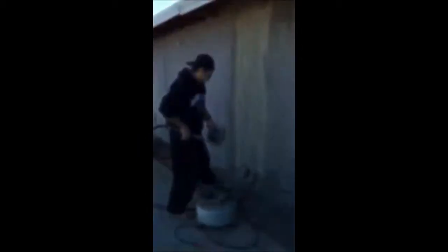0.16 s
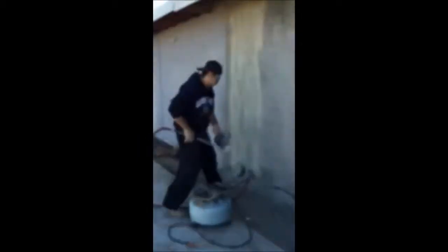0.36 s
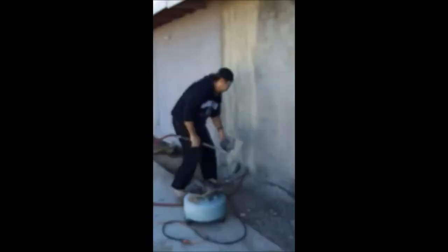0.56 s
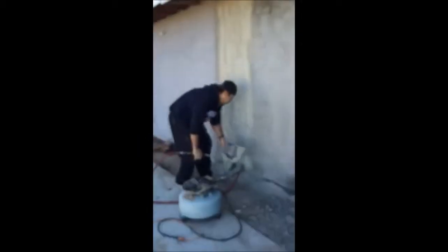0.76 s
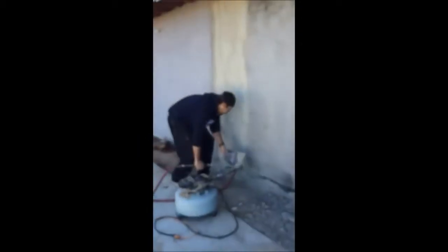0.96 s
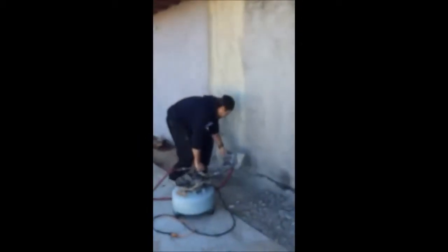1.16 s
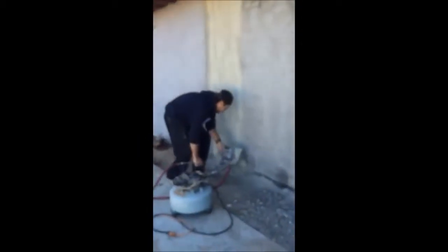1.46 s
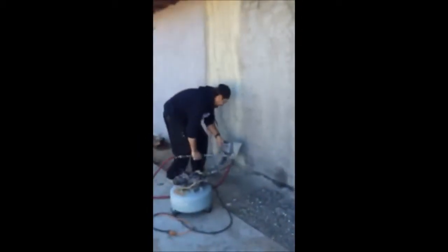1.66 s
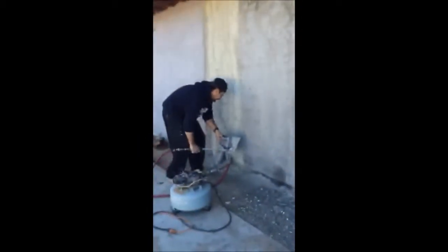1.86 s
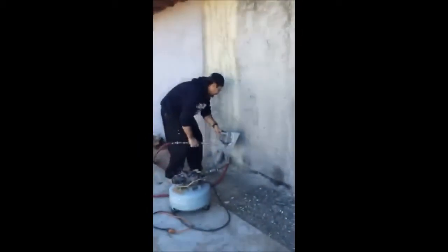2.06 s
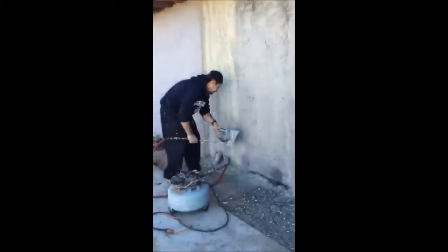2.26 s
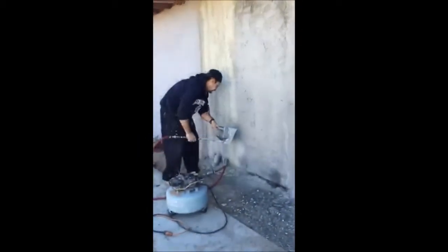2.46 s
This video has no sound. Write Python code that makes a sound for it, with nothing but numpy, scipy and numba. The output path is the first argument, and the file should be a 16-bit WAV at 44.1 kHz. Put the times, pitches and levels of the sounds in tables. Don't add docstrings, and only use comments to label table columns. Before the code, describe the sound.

Compressed-air plaster sprayer bursts into a loud, sputtering hiss over a steadily chugging compressor outdoors

```python
import sys
import numpy as np
from scipy import signal
from scipy.io import wavfile
from scipy.ndimage import map_coordinates
from numba import njit

SR = 44100
rng = np.random.default_rng(int(sys.argv[2]) if len(sys.argv) > 2 else 0)


def ratio(d):
    e = np.asarray(d, float) / 20
    return 10 ** e


def to_wav(sig):
    pcm = np.clip(np.atleast_2d(sig), -1, 1) * 32767
    pcm = np.round(pcm).astype(np.int16)
    wavfile.write(sys.argv[1], SR, pcm.T)


N = 115101
T = np.arange(N) / SR

# time in seconds, air flow in dB, second cavity in Hz, upper cavities in dB.
GUN_FLOW = [(1.36, -13, 3300, -4.5), (1.42, -15, 3500, -5), (1.6, -20.5, 3480, -6.5), (1.67, -18, 3800, -5),
            (1.78, -18, 3900, -10), (1.93, -18, 3330, -2), (2.05, -17.5, 3300, -4.5),
            (2.22, -17, 2910, -6.5), (2.32, -17.5, 3220, -3.5), (2.48, -19.5, 3070, -2.5),
            (2.61, -17, 2850, -4)]
# time in seconds, lowest cavity in Hz, its partner in Hz,
# dead band in Hz, strength in dB.
NOZZLE_SHAPE = [(1.36, 2110, 2650, 2000, -2), (1.43, 1680, 2200, 2770, -1), (1.6, 1820, 2190, 2700, 1.5),
                (1.75, 1750, 2080, 2840, -1), (1.82, 1580, 1940, 2740, 3), (1.93, 1300, 1650, 2190, -1),
                (2.05, 1290, 2430, 2690, -0.5), (2.2, 1290, 2170, 2620, 1.5), (2.3, 1260, 1920, 2440, -2),
                (2.45, 1250, 1660, 2380, -0.5), (2.55, 1280, 1690, 2360, 1.5), (2.61, 1250, 2020, 2400, -8)]
# time in seconds, level in dB.
THROAT_SONG = [
    (1.36, 0.5),
    (1.5, 0.5),
    (1.6, -3),
    (1.95, -2),
    (2.2, -10),
    (2.32, -4.5),
    (2.51, 4.5),
    (2.54, -23),
    (2.61, -23),
]
# time in seconds, peak in dB.
EARLY_SLUGS = [(1.361, -8), (1.382, 0), (1.406, -9), (1.434, -1), (1.451, -5), (1.469, -3), (1.484, -11),
               (1.5024, 1), (1.512, -2), (1.534, 0), (1.566, 3), (1.58, -11), (1.602, 1), (1.621, 0.5),
               (1.6542, -6), (1.6833, -6.5), (1.697, -21), (1.715, -6), (1.7436, -6), (1.771, -10),
               (1.7928, 2.5), (1.8094, -9), (1.84, -5.5), (1.8634, -13), (1.8845, -0.5), (1.8914, -11),
               (1.916, -9), (1.9395, -7.5), (1.9706, -10)]
# time in seconds, peak in dB.
LATE_SLUGS = [(1.993, -12), (2.021, -9.5), (2.0565, -9), (2.0784, -14), (2.1034, -13), (2.1274, -27),
              (2.1506, -11.5), (2.1894, -34), (2.2034, -12), (2.2253, -0.5), (2.2534, -11), (2.282, -8.5),
              (2.3067, -9), (2.324, -2), (2.3354, -8), (2.3514, -15), (2.3703, -5.5), (2.3824, -2),
              (2.393, -10), (2.411, -7), (2.4247, -19), (2.448, -3), (2.4644, -26), (2.4794, -2.5),
              (2.5004, -6), (2.5184, -4), (2.5344, -15), (2.5454, -3), (2.5664, -25), (2.5903, 2)]
# frequency in Hz, density in dB per Hz.
JET_COLOUR = [(400, -34), (800, -16.5), (1700, -4.5), (4400, -2.5), (8000, -11.5), (10500, -8.5),
              (13000, -10.5), (16500, -9)]
# frequency in Hz, width in Hz, level in dB.
MIST_WHISTLES = [(5590, 820, -14), (6960, 900, -17.5), (8330, 590, -17.5), (12950, 1300, -15)]
# time in seconds, level in dB.
HOPPER_LEVEL = [(1.36, -63), (1.39, -26), (1.47, -26.5), (1.56, -31), (1.61, -48.5), (1.72, -42),
                (1.77, -30), (1.83, -42), (2.0, -44), (2.06, -30), (2.12, -40), (2.3, -46), (2.35, -30),
                (2.42, -53), (2.61, -28)]
# frequency in Hz, level in dB,
# decay by 60 dB in seconds, delay in seconds.
EXHAUST_RINGS = [(2280, -30, 0.05, .004), (3300, -33, 0.04, .0165), (3400, -33, .04, .027)]
# multiple of the firing rate, level in dB.
ENGINE_ORDERS = [(1, -35), (2, -4), (3, -19), (4, -23.5), (5, 1.5), (6, -0.5), (7, 2), (8, -10.5), (9, -4),
                 (10, -31), (11, -11.5), (12, -0.5), (13, -6), (14, -0.5), (15, -2.5), (16, 0), (17, -3.5),
                 (18, -13), (19, -22.5), (20, -9), (21, -11.5), (22, -23.5), (23, -9.5), (24, -25),
                 (25, -49), (26, -9.5), (27, -3), (28, -4), (29, -2.5), (30, 1.5), (31, -3), (32, -7),
                 (33, -4), (34, -11), (35, -0.5), (36, -12), (37, -14), (38, 1), (39, 0.5), (40, -19),
                 (41, -9.5), (42, -10), (43, -5), (44, -9), (45, -11), (46, -10.5), (47, -8), (48, -9),
                 (49, -28), (50, -27), (51, -14), (52, -7), (53, -10), (54, 1), (55, -20), (56, -9),
                 (57, -4), (58, 1.5), (59, 2.5), (60, -5)]
# frequency in Hz, arrival after firing in seconds,
# phase scatter in radians.
PIPE_DELAY = [(60, .016, .2), (100, .016, .2), (140, .002, .2), (300, .002, .3), (380, .001, .5),
              (560, .012, .5), (800, .001, .5), (1150, .003, .5), (1400, .003, 1.3), (1700, .004, 3)]
# frequency in Hz, width in Hz, level in dB,
# centre after firing in seconds, length in seconds.
VALVE_HISSES = [(9100, 570, -35.5, 0.0207, 0.0044), (9350, 700, -38.5, 0.022, 0.0056),
                (14500, 700, -41, .0035, .005), (14600, 700, -41, .008, .0045),
                (6560, 780, -41, 0.024, 0.0049), (12900, 1300, -47, .0243, .003)]
# time in seconds, level in dB.
PUMP_CHUFFS = [(.06, -25), (.32, -24.5), (.48, -23.5), (.70, -21.5), (.93, -24), (1.18, -20), (1.41, -56),
               (1.64, -64), (1.87, -28), (2.1, -40), (2.33, -34), (2.56, -46)]
# frequency in Hz, width in Hz, level in dB.
CHUFF_COLOUR = [(1357, 670, -1.5), (3830, 1100, -12.5), (5860, 4800, -12.5)]
# frequency in Hz, width in Hz, level in dB.
CASING_PANELS = [(1900, 550, -36), (1160, 620, -38.5), (3300, 310, -39), (9560, 1500, -42),
                 (6280, 860, -41.5), (4140, 570, -42.5), (12900, 5200, -42.5), (15000, 900, -49)]
# frequency in Hz, density in dB per Hz.
CLATTER_COLOUR = [(25, -22), (110, -4.5), (400, -10.5), (750, -8), (1300, -5.5), (2600, -9), (7000, -17),
                  (15500, -39)]

TRIGGER_S, OPEN_S = 1.3585, .002
SLUG_RISE_S, SLUG_FALL_S, SLUG_MEAN_DB = 0.0017, 0.0021, -4
FIRST_STRETCH, SETTLE_S = 4, 0.12
CAVITY_WIDTH_HZ, UPPER_WIDTH_HZ, THIRD_CAVITY_HZ = 380, 480, 4400
FIRING_HZ, FIRST_FIRING_S = 32.09, .0085


def rms_one(x):
    return x / np.sqrt(np.mean(x ** 2) + 1e-20)


def in_time(rows):
    s, *columns = np.transpose(rows)
    return [np.interp(T, s, c) for c in columns]


def drift(rate):
    r = np.exp(-20 * np.pi * rate / SR)
    white = rng.standard_normal(N // 10 + 4002)
    slow = signal.lfilter([1], [1, -2 * r, r * r], white)[4000:]
    return np.interp(np.arange(N) / 10, np.arange(len(slow)), rms_one(slow))


@njit
def glide(x, c, r):
    y = np.zeros(len(x))
    for i in range(2, len(x)):
        y[i] = (1 - r * r) / 2 * (x[i] - x[i - 2]) + 2 * r * c[i] * y[i - 1] - r * r * y[i - 2]
    return y


def resonance(x, hz, width_hz):
    return glide(x, np.cos(2 * np.pi * hz / SR) + np.zeros(len(x)), np.exp(-np.pi * width_hz / SR))


def hiss_in(hz, width_hz):
    once = resonance(rng.standard_normal(N), hz, width_hz)
    return rms_one(resonance(once, hz, width_hz))


def banded_noise(spectrum, patchy_db, rate):
    out = np.zeros(N)
    edges = 22 * 2 ** np.arange(0, 9.7, 1 / 3)
    hz, level_db = np.transpose(spectrum)
    white = rng.standard_normal((2, N))
    for k, (low, high) in enumerate(zip(edges, edges[1:])):
        band_filter = signal.butter(2, [low, high], "band", fs=SR, output="sos")
        band = signal.sosfilt(band_filter, white[k % 2])
        db = np.interp(np.log(low * high) / 2, np.log(hz), level_db)
        out += ratio(db + patchy_db * drift(rate)) * band
    return rms_one(out)


def humps(rows, rise_s, fall_s):
    return sum(ratio(db) * np.exp(-.5 * ((T - s) / np.where(T < s, rise_s, fall_s)) ** 2) for s, db in rows)


def gun():
    flow_db, second_hz, upper_db = in_time(GUN_FLOW)
    low_hz, partner_hz, dead_hz, lower_db = in_time(NOZZLE_SHAPE)
    gate = np.clip((T - TRIGGER_S) / OPEN_S, 0, 1)
    slugs = plaster_slugs() * ratio(flow_db.mean() - flow_db)
    cavity = nozzle_cavities(low_hz, partner_hz, lower_db, second_hz, upper_db)
    jet = air_jet(dead_hz, second_hz)
    throb = (0.44 + 1.17 * slugs) * cavity + (0.88 + 0.89 * np.tanh(slugs)) * jet
    sputter = ratio(2 * drift(150))
    return gate * (ratio(flow_db) * (sputter * throb + air_rumble()) + hopper_drone())


def plaster_slugs():
    rows = [(s + SLUG_RISE_S, db - SLUG_MEAN_DB) for s, db in list(EARLY_SLUGS) + list(LATE_SLUGS)]
    stretch = 1 + FIRST_STRETCH * np.exp(-np.abs(T - TRIGGER_S) / SETTLE_S)
    return humps(rows, SLUG_RISE_S, SLUG_FALL_S * stretch)


def nozzle_cavities(low_hz, partner_hz, lower_db, second_hz, upper_db):
    second_level = ratio(2 + 1.2 * drift(36))
    second = second_level * hiss_in(second_hz * (1 + 0.015 * drift(16.7)), UPPER_WIDTH_HZ)
    third_level = ratio(-1.5 + in_time(THROAT_SONG)[0] + 0.64 * drift(40))
    third = third_level * hiss_in(THIRD_CAVITY_HZ * (1 + 0.015 * drift(6.2)), UPPER_WIDTH_HZ)
    lower = np.zeros(N)
    for hz in (low_hz, partner_hz):
        level = ratio(lower_db - 3 + 1.2 * drift(30))
        lower += level * hiss_in(hz * (1 + .015 * drift(18)), CAVITY_WIDTH_HZ)
    return ratio(-3.5) * lower + ratio(1.35 * upper_db) * (second + third)


def air_jet(dead_hz, second_hz):
    jet = ratio(-1.5) * banded_noise(JET_COLOUR, patchy_db=1.5, rate=27) + wall_splat()
    for hz, width_hz, db in MIST_WHISTLES:
        level = ratio(db + 3.5 * drift(6.4))
        jet = jet + level * hiss_in(hz * (1 + .04 * drift(3.5)), width_hz)
    for valley_hz in (dead_hz, (second_hz + THIRD_CAVITY_HZ) / 2):
        jet = jet - .55 * resonance(jet, valley_hz, 500)
    return jet


def wall_splat():
    hits = rng.random(N) < 580 / SR
    size = ratio(3.8 * rng.exponential(1, N).clip(0, 4))
    drops = hits * rng.standard_normal(N) * size
    return ratio(-13) * rms_one(resonance(drops, 5300, 5400))


def air_rumble():
    roar = ratio(-17) * resonance(hiss_in(290, 445), 296, 580)
    return roar + ratio(-34 + 4.6 * drift(6)) * hiss_in(71, 90)


def hopper_drone():
    shell_hz = 221.5
    hum = np.sin(2 * np.pi * np.cumsum(shell_hz * (1 + 0.029 * drift(14.7))) / SR)
    return ratio(in_time(HOPPER_LEVEL)[0]) * (hum + ratio(-2.5) * hiss_in(shell_hz, 100))


def engine():
    return exhaust_rings() + exhaust_note() + valves()


def exhaust_rings():
    lead = SR // 2
    fire = FIRST_FIRING_S + np.arange(-12, 83) / FIRING_HZ
    fire = fire + .00005 * rng.standard_normal(len(fire))
    rings = np.zeros(N + SR)
    for hz, db, t60, delay in EXHAUST_RINGS:
        clicks = np.full(N + SR, 1e-18)
        at = ((fire + delay) * SR).astype(int) + lead
        clicks[at] = ratio(db + .6 * rng.standard_normal(len(fire)))
        r, w = ratio(-60 / (t60 * SR)), 2 * np.pi * hz / SR
        rings += signal.lfilter([0, np.sin(w)], [1, -2 * r * np.cos(w), r * r], clicks)
    return rings[lead:lead + N]


def exhaust_note():
    k, db = np.transpose(ENGINE_ORDERS)
    hz, delay, scatter = np.transpose(PIPE_DELAY)
    order_hz = k * FIRING_HZ
    lag = 2 * np.pi * FIRING_HZ * np.cumsum(np.interp(order_hz, hz, delay) * np.diff(k, prepend=0))
    lag = lag + np.pi + np.interp(order_hz, hz, scatter) * rng.standard_normal(len(k))
    waver = [ratio(1.4 * drift(10.5)) for _ in range(8)]
    turn = 2 * np.pi * FIRING_HZ * (T - FIRST_FIRING_S)
    note = np.zeros(N)
    for i in range(len(k)):
        note += ratio(db[i]) * waver[i * 8 // len(k)] * np.cos(k[i] * turn - lag[i])
    return ratio(-25) * rms_one(note)


def valves():
    out = np.zeros(N)
    for hz, width_hz, db, centre, length in VALVE_HISSES:
        off = ((T - FIRST_FIRING_S - centre) * FIRING_HZ + .5) % 1 - .5
        opening = np.exp(-.5 * (2 * off / FIRING_HZ / length) ** 2)
        out += ratio(db + 1.1 * drift(25)) * opening * hiss_in(hz, width_hz)
    return out


def pump():
    breath = sum(ratio(db) * hiss_in(hz, width_hz) for hz, width_hz, db in CHUFF_COLOUR)
    return humps(PUMP_CHUFFS, 0.021, 0.021) * breath


def casing_and_yard():
    panels = sum(ratio(db + .9 * drift(5.8)) * hiss_in(hz, width_hz) for hz, width_hz, db in CASING_PANELS)
    return panels + ratio(-28) * banded_noise(CLATTER_COLOUR, patchy_db=2.9, rate=11.7)


def scene():
    near = gun()
    lag = .0007 * SR * (1 + 0.32 * np.tanh(drift(1.46)))
    echo = ratio(-15) * map_coordinates(near, [np.arange(N) - lag], order=3)
    return (near + echo + engine() + pump() + casing_and_yard())[None, :]


def roll_off(x):
    return signal.sosfilt(signal.butter(12, 16290, fs=SR, output="sos"), x)


def record(dry):
    x = dry[0]
    for notch_hz, width_hz, depth in ((10450, 400, 0.65), (13700, 300, .55)):
        x = x - depth * resonance(x, notch_hz, width_hz)
    x = x / (1 + (x / .78) ** 4) ** .25
    top_cut = signal.ellip(12, .3, 60, 15270, fs=SR, output="sos")
    x = signal.sosfilt(top_cut, x)
    return roll_off(x[None, :])


dry = scene()
out = record(dry)
to_wav(out)
```